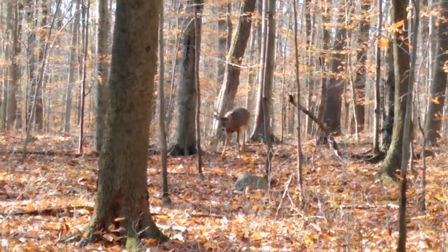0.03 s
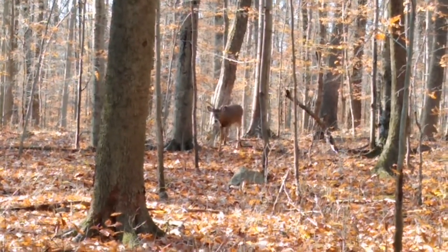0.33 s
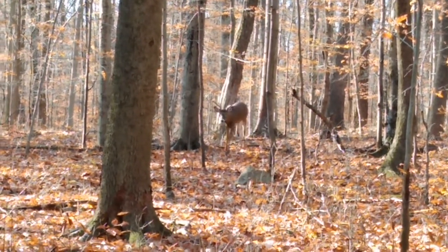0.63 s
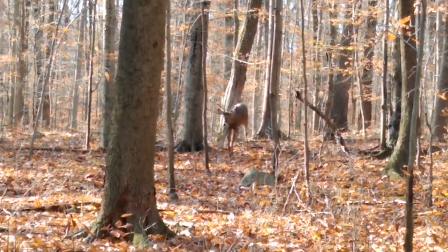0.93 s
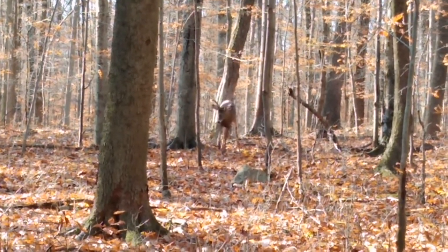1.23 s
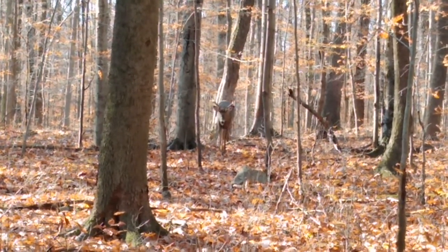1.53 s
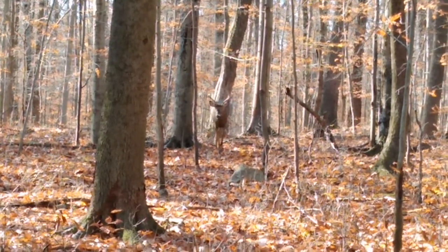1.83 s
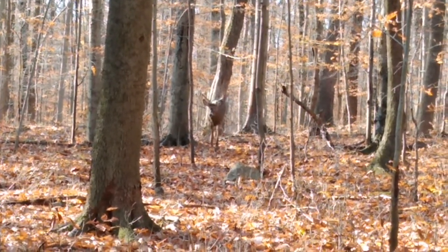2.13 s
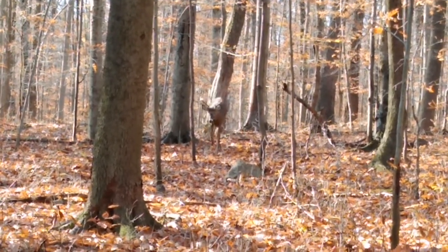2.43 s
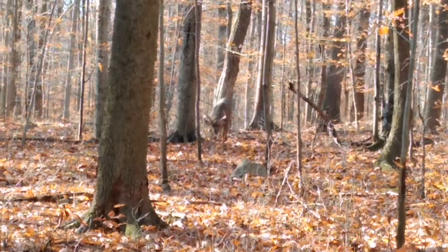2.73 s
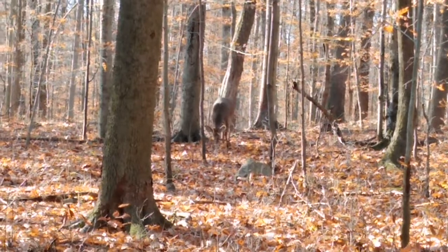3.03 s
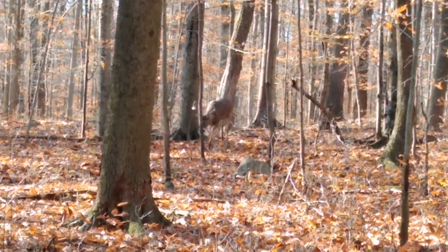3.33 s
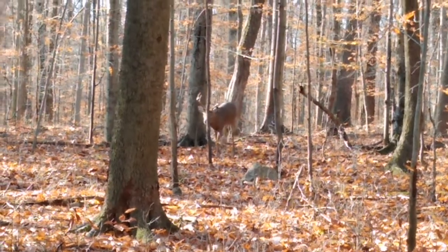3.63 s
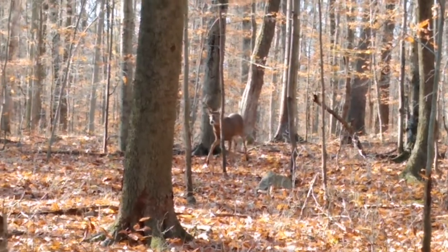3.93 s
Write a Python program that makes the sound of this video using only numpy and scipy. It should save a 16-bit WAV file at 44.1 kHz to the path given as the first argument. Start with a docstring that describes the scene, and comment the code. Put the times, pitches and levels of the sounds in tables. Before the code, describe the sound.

Light wind rumbles through a wood and gusts once, over faint steps in dry leaves.

```python
"""Light wind in an open autumn wood. From the start, a hollow low rumble lies over a steady far hiss,
and a distant deer steps through dry leaves, snapping a twig now and then. Around one second in, a faint
whistle rises and a thin whirr, probably a lens motor, runs briefly on the left. After two seconds the
wind swells into one gust and the steps come closer together; the gust eases before the end.
A delayed cross-feed widens the hiss, the rush of the wind and the leaves."""
import sys
import numpy as np
from scipy import signal
from scipy.fft import rfft, irfft
from scipy.io import wavfile
from scipy.ndimage import uniform_filter1d

SR = 44100
rng = np.random.default_rng(int(sys.argv[2]) if len(sys.argv) > 2 else 0)


def store_wav(level_fs):
    """Save 16-bit WAV to argv[1]."""
    pcm = np.round(np.clip(np.atleast_2d(level_fs), -1, 1) * 32767)
    wavfile.write(sys.argv[1], SR, pcm.T.astype(np.int16))


N = 176400
T = np.arange(N) / SR
HZ = np.maximum(np.arange(N // 2 + 1) * SR / N, 1)


def from_db(db):
    """Decibels to gain."""
    return 10 ** (np.asarray(db) / 20)


def unit_rms(x):
    """Scale to an RMS of one."""
    return x / np.sqrt(np.mean(x ** 2) + 1e-20)


def over_time(rows):
    """Draw automation curves through breakpoints, one curve for each column after the time."""
    seconds, *columns = np.transpose(rows)
    return np.squeeze([np.interp(T, seconds, column) for column in columns])


def over_frequency(points):
    """Draw an EQ curve through breakpoints on a log frequency axis."""
    hz, value = np.transpose(points)
    return np.interp(np.log(HZ), np.log(hz), value)


def pan(db):
    """Constant-power stereo gains; positive dB leans left."""
    return unit_rms(from_db(np.array([[db], [-db]]) / 2))


def white():
    """White noise, independent in left and right."""
    return rng.standard_normal((2, N))


def drift(rate_hz):
    """A smooth random modulator with an RMS of one."""
    return unit_rms(irfft(rfft(rng.standard_normal(N)) / (1 + (HZ / rate_hz) ** 2), N))


def colour(x, eq):
    """Shape a white sound with an EQ curve, keeping its power."""
    return irfft(rfft(x) * unit_rms(from_db(over_frequency(eq))), N)


def resonances(rows, flicker_db=0, flicker_hz=1):
    """Noise rings in stereo bands, each with its own place and its own level flicker."""
    out = 0
    for hz, width_hz, db, pan_db, left_lead_rad, likeness in rows:
        detuning = (HZ ** 2 - hz ** 2) / (HZ * width_hz * np.sqrt(2))
        mid, side = rfft(white()) / (1 + detuning ** 2) ** 1.5
        mid, side = mid * np.sqrt(1 + likeness), side * np.sqrt(1 - likeness)
        band = irfft(np.array([(mid + side) * np.exp(1j * left_lead_rad), mid - side]), N)
        out = out + unit_rms(band) * pan(pan_db) * from_db(db + flicker_db * drift(flicker_hz))
    return out


def widen(x, delay_s=0.000437):
    """Subtract from each channel a delayed copy of the other, combing the stereo image."""
    # Each row: frequency in Hz, share fed across from 0 to 1.
    crossfeed = [(50, 0.55), (250, 0.15), (700, 0.41), (1100, 0.74), (2000, 1), (2550, 1), (3400, 0.39),
                 (4550, 0.47), (5700, 0.22), (8000, 0.16), (12000, 0.13), (14000, 0.28)]
    spectrum, share = rfft(x), over_frequency(crossfeed)
    crossed = share * np.exp(-2j * np.pi * HZ * delay_s) * spectrum[::-1]
    return irfft((spectrum - crossed) / np.sqrt(1 + share ** 2), N)


def far_hiss():
    """The bed: smooth, steady hiss and rumble from far off in the wood."""
    # Each row: frequency in Hz, noise density in dB per Hz.
    density = [(20, -99), (32, -92), (45, -86), (62, -80), (85, -81), (105, -75.5), (150, -88),
               (300, -84.5), (600, -87), (1000, -97.5), (1500, -99.5), (2200, -100.5), (3200, -101.5),
               (5000, -104.5), (7000, -106.5), (10000, -108.5), (12000, -110), (14200, -115)]
    # Each row: frequency in Hz, left over right in dB.
    balance = [(60, -1), (300, -1), (1000, 0.5), (3000, -1.5), (6000, -3), (10000, 2), (14000, 0.5)]
    gains = from_db(over_frequency(density) + over_frequency(balance) * np.array([[.5], [-.5]]))
    return widen(irfft(rfft(white()) * gains * np.sqrt(SR / 2), N))


def moan(pitch_hz, width_hz, pan_db=-7, left_lead_rad=0.14, likeness=0.98):
    """A narrow band of noise sings fairly evenly while its centre wanders."""
    centre_hz = pitch_hz.mean()
    ring = resonances([(centre_hz, width_hz, 0, pan_db, left_lead_rad, likeness)])
    window_s, evening = 0.029, 0.51  # compress away about half of the level swing
    power = uniform_filter1d(np.mean(ring ** 2, axis=0), int(window_s * SR) + 1) + 1e-9
    even_ring = unit_rms(ring / np.sqrt(power) ** evening)
    glide = np.exp(2j * np.pi * np.cumsum(pitch_hz - centre_hz) / SR)
    return np.real(signal.hilbert(even_ring) * glide)


def wind():
    """Turbulence stirs hollow resonances and a broad rush into one gust, over a deep rumble."""
    # The wind's strength. Each row: time in seconds, level in dB.
    gust = [(0, -52), (.22, -53), (.4, -52.5), (.62, -54.5), (.87, -48.5), (1.25, -49.5), (1.7, -55.5),
            (1.9, -51), (2.04, -45), (2.17, -46), (2.21, -42), (2.32, -39), (2.63, -42.5), (2.73, -40),
            (2.8, -43), (2.86, -39), (2.92, -46), (3.01, -40), (3.09, -41), (3.125, -49.5), (3.16, -41),
            (3.27, -42.5), (3.37, -46.5), (3.68, -47.5), (4, -50.5)]
    # Hollow tones of steady pitch. Each row: centre in Hz, width in Hz, level in dB against the gust,
    # pan in dB, left phase lead in radians, likeness of the channels from 0 to 1.
    hollow_bands = [(290, 49, -9.5, -7, 0.25, 0.99), (338.7, 65, -9, 0, 0.1, 0.98),
                    (423, 58, -13.5, -6.5, 0.13, 0.98), (489.4, 52, -15, -6, 0.72, 0.83),
                    (584.6, 82, -18, -8, 0.2, 0.96), (647, 70, -24.5, -5.5, 0.6, 0.97)]
    # Two wandering tones. Each row: time in seconds, pitch in Hz, level in dB against the gust.
    main_moan = [(0, 305.6, 1.5), (.22, 289.4, 2.5), (.45, 304.9, -8.5), (.8, 323, 0.5), (1.3, 307.5, -9),
                 (1.78, 300.1, -6.5), (2.02, 298.6, -1), (2.35, 302.7, -3.5), (2.75, 317, -0.5),
                 (3.05, 329.3, -1), (3.27, 318, -1.5), (3.55, 305, -9), (4, 325, 1.5)]
    upper_moan = [(0, 430.7, -34), (.3, 437.2, -22), (.52, 465.8, 0.5), (.8, 452.1, -11.5),
                  (1.2, 447.3, -27), (1.52, 458.3, 2), (1.65, 447.7, -8.5), (1.82, 424.1, 1),
                  (2.05, 437.4, -10), (2.4, 453.4, -10.5), (2.8, 456.5, -5.5), (3.2, 443.8, -10.5),
                  (4, 455.3, -4)]
    # The low end has its own fader. Each row: time in seconds, level in dB.
    deep_level = [(0.0, -46), (0.03, -67), (1.01, -58), (1.73, -59), (2.32, -50), (2.34, -49),
                  (3.04, -49.5), (3.2, -59.5), (3.36, -54), (3.72, -60.5), (3.92, -52.5), (4.0, -53.5)]
    # Its resonances, laid out like hollow_bands, with levels against that fader.
    deep_bands = [(140.5, 40, -1.5, -5, -1.08, 0.91), (184, 64, -0.5, -4, -0.75, 0.97),
                  (227, 39, -4, 0, -1.34, 1)]
    # The colour of the rush. Each row: frequency in Hz, relative level in dB.
    rush_eq = [(40, -39), (100, -3), (250, -2), (450, -1), (650, -13.5), (800, -12), (1000, -19.5),
               (1400, -26), (3000, -26.5), (8000, -53)]
    flicker_db, flicker_hz = 2.17, 25
    gust_db = over_time(gust)
    hollow = resonances(hollow_bands, flicker_db, flicker_hz)
    for curve, width_hz in ((main_moan, 51), (upper_moan, 35.5)):
        pitch_hz, db = over_time(curve)
        hollow = hollow + from_db(db) * moan(pitch_hz, width_hz)
    deep = from_db(over_time(deep_level)) * resonances(deep_bands, flicker_db, flicker_hz)
    rush_db = -55.5 + 0.46 * (gust_db - gust_db.mean())  # rides about half of the gust's swing
    rush = from_db(rush_db) * colour(white(), rush_eq)
    return from_db(gust_db) * hollow + deep + widen(rush)


def crackles(power, per_s=2400, spread_db=1.6, likeness=0.25, clump_db=1.26):
    """Dry leaves give tiny random cracks, in uneven clumps, following a power envelope."""
    sizes = from_db(spread_db * np.minimum(rng.exponential(1, (3, N)), 4))
    clicks = sizes * rng.choice([-1, 1], (3, N))
    shared, left, right = clicks * (rng.random((3, N)) < per_s / SR)
    cracks = unit_rms(np.sqrt(likeness) * shared + np.sqrt(1 - likeness) * np.array([left, right]))
    return cracks * np.sqrt(power) * from_db(clump_db * drift(rate_hz=140))


def deer_steps():
    """Hooves crush dry leaves into a bright crackle; heavy steps carry more low crunch."""
    # Each row: start in seconds, length in seconds, level in dB, crunch in dB against the crackle.
    steps = [(0.0, 0.039, -67, -7), (0.27, 0.024, -64.5, -12), (0.674, 0.065, -66.5, -8),
             (2.18, 0.13, -68.5, -9), (2.415, 0.039, -61.5, -11), (2.475, 0.031, -62.5, -6),
             (2.552, 0.11, -68, -4), (2.76, 0.084, -68, -6), (2.883, 0.078, -69.5, -4),
             (2.96, 0.038, -62, -3), (3.043, 0.057, -71, -7), (3.308, 0.035, -63.5, -9),
             (3.402, 0.018, -63, -16), (3.46, 0.024, -72, -14), (3.576, 0.025, -64, -12),
             (3.614, 0.023, -64.5, -12), (3.73, 0.028, -64.5, -8), (3.86, 0.13, -66, -14)]
    # The rustle between steps. Each row: time in seconds, level in dB.
    rustle = [(0, -76), (.6, -75), (.85, -70.5), (1.75, -73), (2.15, -79), (2.3, -70.5), (3.2, -70),
              (4, -74)]
    # The colours of the two layers. Each row: frequency in Hz, relative level in dB.
    crackle_eq = [(1000, -24), (3000, -6), (4500, -3), (5700, -1), (7000, -3), (8200, -2.5), (11000, -2.5),
                  (12500, -4.5), (14000, -8.5)]
    crunch_eq = [(1200, -17), (3200, 0.5), (5800, -2), (8000, -22)]
    attack_s, release_s = 0.014, 0.038
    crackle_power, crunch_power = from_db(over_time(rustle)) ** 2, 0
    for start, length, db, crunch_db in steps:
        attack = np.clip((T - start) / attack_s, 0, 1)
        press = attack * np.exp(-np.maximum(T - start - length, 0) / release_s)
        crackle_power = crackle_power + (from_db(db) * press) ** 2
        crunch_power = crunch_power + (from_db(db + crunch_db) * press) ** 2
    return widen(colour(crackles(crackle_power), crackle_eq) + colour(crackles(crunch_power), crunch_eq))


def twig_snaps():
    """Twigs break with a short, bright ring and a spray of splinters, mostly a little to the right."""
    # Each row: start in seconds, level in dB, decay in seconds, ring centre in Hz, pan in dB,
    # splinters in dB against the ring.
    snaps = [(0.6283, -60, .0016, 5900, -6, -8), (1.670, -61.5, 0.017, 7800, -4, -3),
             (2.2032, -53, 0.0027, 5700, -3, -4), (2.2676, -48.5, 0.00083, 5800, -2, 1.5),
             (2.998, -58, .0012, 6000, -2, 0), (3.346, -62, .0015, 6000, 0, 0),
             (3.4181, -56, .002, 8300, -1, -5)]
    # The colour of the splinters. Each row: frequency in Hz, relative level in dB.
    splinter_eq = [(2000, -28), (5000, -2), (9000, -3), (11500, 3), (14000, -7)]
    width_hz, likeness = 1000, 0.5
    out, splinters = 0, colour(white(), splinter_eq)
    for start, db, decay_s, hz, pan_db, splinter_db in snaps:
        ring = resonances([(hz, width_hz, 0, 0, 0, likeness)])
        envelope = (T >= start) * np.exp(-np.abs(T - start) / decay_s)
        out = out + from_db(db) * pan(pan_db) * envelope * (ring + from_db(splinter_db) * splinters)
    return out


def whistle():
    """A faint, far tone in the middle wavers and sags in pitch."""
    # Each row: time in seconds, pitch in Hz, level in dB.
    contour = [(0, 1091, -89), (.8, 1086, -82), (1.15, 1078, -72.5), (1.7, 1085, -80), (2.3, 1067, -70.5),
               (3.1, 1056, -72), (3.4, 1053, -78), (4, 1053, -81)]
    pitch_hz, db = over_time(contour)
    waver_hz = 6.94 * drift(rate_hz=5.1)
    return from_db(db) * moan(pitch_hz + waver_hz, width_hz=25, pan_db=0, left_lead_rad=0, likeness=0.97)


def lens_motor():
    """A small motor on the left: a thin whirr surges over a softer, lower drive that runs longer."""
    # The whirr's fader. Each row: time in seconds, level in dB.
    surges = [(.8, -100), (.91, -71), (.94, -75), (1.03, -60.5), (1.12, -66), (1.22, -61.5), (1.34, -64.5),
              (1.4, -60.5), (1.44, -66.5), (1.48, -60), (1.54, -68), (1.66, -100)]
    # The motor's resonances. Each row: centre in Hz, width in Hz, level in dB before the fader,
    # pan in dB, left phase lead in radians, likeness of the channels from 0 to 1.
    whirr_bands = [(8880, 620, -4, 9, 3, 1), (8400, 1200, -6.5, 1, -1, 0.7),
                   (9600, 1300, -6.5, 11, 1.7, 0.6)]
    drive_bands = [(4980, 190, -77, 5.9, 3, 0.7), (5270, 500, -73.5, 10, 3.1, 0.72),
                   (6300, 470, -77.5, 5.7, 2.5, 0.45)]
    start_s, stop_s, ramp_s = 0.72, 1.85, 0.28
    flicker_db, flicker_hz = 2.0, 22
    drive_fader = np.clip(np.minimum(T - start_s, stop_s - T) / ramp_s, 0, 1)
    whirr = from_db(over_time(surges)) * resonances(whirr_bands, flicker_db, flicker_hz)
    return whirr + drive_fader * resonances(drive_bands, flicker_db, flicker_hz)


def scene():
    """Mix the wind and the wood with the deer and the motor."""
    return wind() + whistle() + far_hiss() + deer_steps() + twig_snaps() + lens_motor()


def record(dry):
    """A steep low-pass takes off the very top."""
    cutoff_hz = 14300
    return irfft(rfft(dry) / (1 + (HZ / cutoff_hz) ** 400), N)


dry = scene()
out = record(dry)
store_wav(out)
```